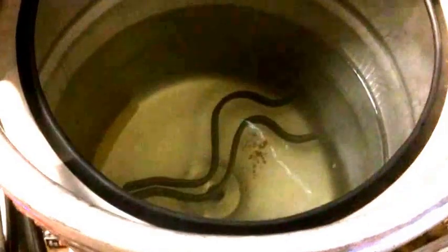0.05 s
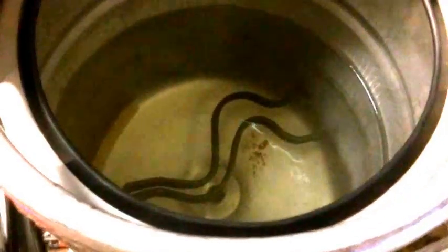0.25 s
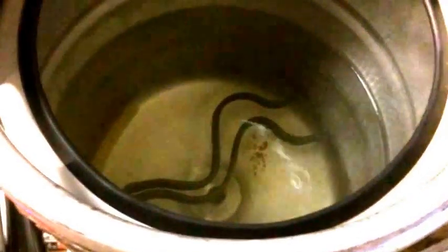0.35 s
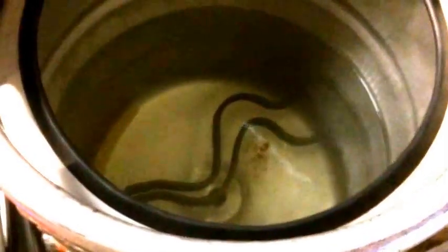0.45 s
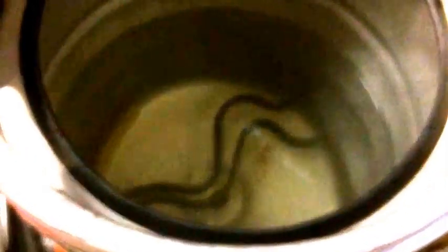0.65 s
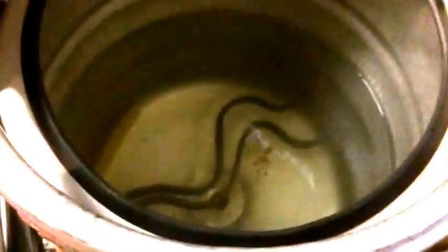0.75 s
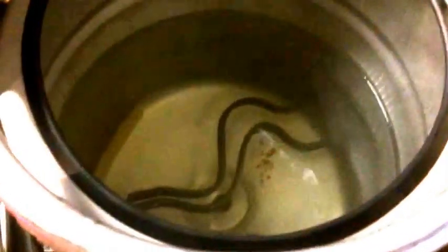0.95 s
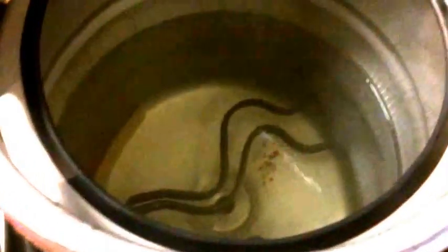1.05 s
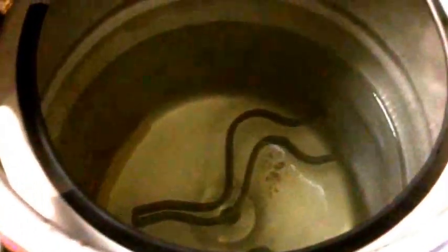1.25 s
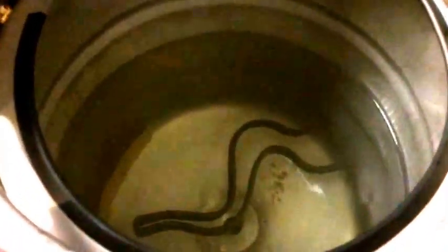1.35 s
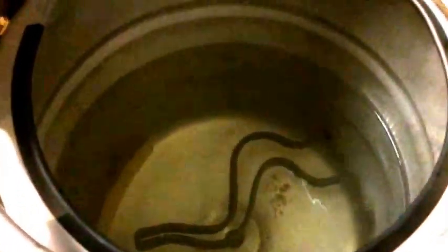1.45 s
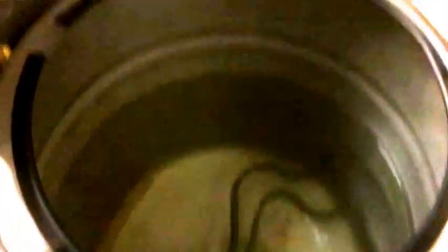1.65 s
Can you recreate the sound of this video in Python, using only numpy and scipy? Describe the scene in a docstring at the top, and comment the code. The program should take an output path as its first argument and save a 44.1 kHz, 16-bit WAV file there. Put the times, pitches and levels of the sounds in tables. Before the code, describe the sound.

A handled camera's plastic case creaks in three short, sharp clicks, the second with a dull thud. A faint hum and hiss with tiny ticks continue in the quiet room. The handling is right at the microphone.

```python
"""A faint hum with a thin whine, hiss, crackle and tiny ticks fills a quiet room.
A camera is handled above an open metal kettle, and its plastic shell creaks in three short bursts:
in stick-slip friction, each slip is an impulse that excites the shell's damped modes.
The fingers rub the case softly and the hand bumps it with dull thuds;
the harder contacts also set the hollow case ringing."""
import sys
import numpy as np
from scipy import signal
from scipy.fft import rfft, irfft, next_fast_len
from scipy.io import wavfile
from scipy.ndimage import map_coordinates

SR = 44100
rng = np.random.default_rng(int(sys.argv[2]) if len(sys.argv) > 2 else 0)


def pcm_store(signal):
    """Save signal as 16-bit PCM."""
    levels = np.round(np.clip(np.atleast_2d(signal), -1, 1) * 32767)
    wavfile.write(sys.argv[1], SR, levels.astype(np.int16).T)


N = 74970


def amp(db):
    """Amplitude ratio of a level in decibels."""
    return 10 ** (np.asarray(db) / 20)


def gain_at(spectrum, hz):
    """Spectral envelope: gain at hz, from (frequency, level) points joined on a log frequency axis."""
    frequencies, levels = np.transpose(spectrum)
    return amp(np.interp(np.log(hz + 1), np.log(frequencies + 1), levels))


def wobble(rate):
    """Random modulation: a smooth curve through `rate` Gaussian values a second."""
    return map_coordinates(rng.standard_normal(512), [np.arange(N) * rate / SR], mode="wrap")


def noise(spectrum):
    """Spectral shaping: white noise filtered by the envelope and scaled to rms 1."""
    size = next_fast_len(N + SR // 2)
    hz = np.fft.rfftfreq(size, 1 / SR)
    shaped = irfft(rfft(rng.standard_normal(size)) * gain_at(spectrum, hz), size)[:N]
    return shaped / np.sqrt(np.mean(shaped ** 2) + 1e-20)


def pulse(spectrum, pitch=1, cutoff_hz=SR, size=8192):
    """Minimum-phase impulse response of peak 1, shifted in pitch and dulled above cutoff_hz."""
    hz = np.fft.rfftfreq(size, 1 / SR)
    magnitude = gain_at(spectrum, hz / pitch) / (1 + (hz / cutoff_hz) ** 2)
    cepstrum = irfft(np.log(magnitude))
    cepstrum[1:size // 2] *= 2  # folding onto positive time makes the pulse causal
    cepstrum[size // 2 + 1:] = 0
    wave = irfft(np.exp(rfft(cepstrum)))
    return wave / np.abs(wave).max()


def ring(modes, t, pitch=1):
    """Free vibration: a sum of exponentially damped modes."""
    return sum(amp(db - 60 * t / t60) * np.sin(2 * np.pi * hz * pitch * t) for hz, db, t60 in modes)


def add(track, start_s, sound):
    """Superposition: the sound adds to the track from start_s on."""
    part = track[round(start_s * SR):][:len(sound)]
    part += sound[:len(part)]


# spectrum of the room noise: (frequency [Hz], relative spectral density [dB])
ROOM_SPECTRUM = [(20, -25), (45, -1.5), (75, 0), (130, -5.5), (170, -4.5), (220, -18.5), (330, -12),
                 (450, -15), (650, -12), (800, -19), (950, -10.5), (1150, -21.5), (1400, -20.5),
                 (1700, -28.5), (2100, -22), (3100, -31), (3900, -30.5), (5200, -41.5), (6500, -42),
                 (10000, -47.5), (15000, -48.5)]
# tones of the hum and whine: (frequency [Hz], rms level [dB], modulation rate [Hz])
HUM_TONES = [(80.7, -60.5, 8.6), (164.4, -63, 5.24), (560.7, -66, 7), (1017, -61, 7.1), (1876, -74, 13),
             (2135, -85, 17)]
# slow swell of noise and hum together: (time [s], relative level [dB])
ROOM_SWELL = [(0.0, -52.5), (0.434, -55.5), (0.766, -52.5), (1.7, -53)]
def room_tone():
    """Broadband noise plus hum, as of a small fan; amplitude and phase modulation widen each tone."""
    t = np.arange(N) / SR
    hiss = amp(-51 + 1.15 * wobble(rate=8.9)) * noise(ROOM_SPECTRUM)
    hum = np.zeros(N)
    for hz, db, rate in HUM_TONES:
        rms = amp(db + 1.8 * wobble(rate))
        phase_drift = .65 * wobble(2 * rate)
        hum += rms * np.sqrt(2) * np.sin(2 * np.pi * hz * t + phase_drift)
    times, levels = np.transpose(ROOM_SWELL)
    swell_db = np.interp(t, times, levels)
    return amp(swell_db - np.median(swell_db)) * (hiss + hum)


# spectrum of one crackle grain: (frequency [Hz], relative level [dB])
GRAIN_SPECTRUM = [(500, -37), (1700, -9), (2300, -2.5), (3100, -7.5), (3900, -0.5), (5000, -21),
                  (10000, -29.5)]
def crackle(grains_per_s=150, peak_db=-55.5, spread_db=2):
    """Shot noise: faint grains at independent random times make a fine crackle."""
    onsets = rng.random(N) < grains_per_s / SR
    strengths = amp(peak_db + spread_db * np.clip(rng.standard_normal(N), -2, 2))
    return signal.fftconvolve(onsets * strengths, pulse(GRAIN_SPECTRUM))[:N]


# tiny dry ticks: (time before the delay [s], peak level [dB])
TICK_EVENTS = [(0.0693, -48), (0.2702, -52), (0.4303, -49), (0.5705, -48), (0.8712, -51), (1.073, -48),
               (1.1478, -47), (1.4056, -48), (1.4329, -48.5), (1.471, -51)]
# spectrum of one tick: (frequency [Hz], relative level [dB])
TICK_SPECTRUM = [(500, -20), (3000, 3), (6500, 4), (10000, -4.5), (15000, -12.5)]
def ticks(delay_s=.0015):
    """A brief impulse has a broad spectrum: each is heard as a bright tick just above the hiss."""
    track, tick = np.zeros(N), pulse(TICK_SPECTRUM)
    for start_s, db in TICK_EVENTS:
        add(track, start_s + delay_s, amp(db) * tick)
    return track


# envelope of the rub before the loudest bump: (time [s], level [dB])
RUB_ENVELOPE = [(.09, -85), (.116, -56.5), (.145, -51), (0.179, -52), (0.222, -55.5)]
# spectrum of skin sliding on the case: (frequency [Hz], relative spectral density [dB])
RUB_SPECTRUM = [(100, -20), (260, -6), (340, 0), (460, -25), (660, 0.5), (820, -12), (2000, -19),
                (8000, -46)]
def finger_rub():
    """Sliding friction: skin on the hollow case makes a brief swell of soft noise."""
    times, levels = np.transpose(RUB_ENVELOPE)
    envelope = np.interp(np.arange(N) / SR, times, amp(levels), left=0, right=0)
    return envelope * noise(RUB_SPECTRUM)


# soft pushes of the hand: (time [s], peak level before the decay [dB], pitch [ratio], cutoff [Hz])
HAND_BUMPS = [(0.2187, -20, 0.55, 109), (0.2321, -1, 0.94, 358), (0.2472, -11.5, 1.5, 68.6),
              (0.3138, -21.5, 0.96, 45), (0.353, -37, 1.05, 60), (0.782, -42, 1.3, 81),
              (1.423, -40.5, 1.7, 130), (1.5881, -31.5, 3.2, 450), (1.612, -36, 1.24, 118)]
# spectrum of one thud: (frequency [Hz], relative level [dB])
THUD_SPECTRUM = [(10, -21.5), (25, -14), (42, -2), (62, 2), (100, -4), (135, -10.5), (190, -9.5),
                 (250, -22), (350, -29.5), (700, -44.5), (2000, -53)]
# hard contacts within the bumps: (time [s], gain [dB], pitch [ratio], rise time [s])
HARD_KNOCKS = [(.2346, -18, 1.0, .0002), (.3175, -21, .88, .0025)]
# modes of the hollow case: (frequency [Hz], relative level [dB], 60 dB decay time [s])
CASE_MODES = [(671, 4, 0.011), (1416, 3.5, 0.0057), (2500, -30, 0.0078)]
def hand_bumps(decay_t60_s=.16):
    """Impact excitation: slow contacts spare the high modes and thud; hard ones ring the case."""
    track, t = np.zeros(N), np.arange(SR // 10) / SR
    thud_decay = amp(-60 * t / decay_t60_s)
    for start_s, db, pitch, cutoff_hz in HAND_BUMPS:
        thud = pulse(THUD_SPECTRUM, pitch, cutoff_hz)[:len(t)]
        add(track, start_s, amp(db) * thud_decay * thud)
    for start_s, db, pitch, rise_s in HARD_KNOCKS:
        attack = 1 - np.exp(-(t / rise_s) ** 2)
        add(track, start_s, amp(db) * attack * ring(CASE_MODES, t, pitch))
    return track


# slips of the plastic shell: (time [s], relative level [dB], pitch [ratio])
SHELL_SLIPS = [(.056, -45, .8), (.13567, -19, .92), (.13987, -21, .93), (.14318, -17, .96),
               (.14536, -24, .98), (.1474, -24, .87), (.14933, -31, .83), (.14985, -28, .91),
               (.15107, -28, .92), (.15234, -30, .89), (.1532, -26, .81), (.15493, -30, .96),
               (.23469, -23, .72), (.23811, -21, .88), (.23894, -18, .94), (.23942, -18, .98),
               (.23973, -25, .85), (.24212, -32, .98), (.24463, -27, .97), (.24515, -22, 1.01),
               (.24544, -27, .99), (.3208, -44, .62), (.73058, -28, .78), (.73096, -32, .87),
               (.73246, -26, .79), (.73388, -20, 1.0), (.73443, -28, 1.06), (.7351, -27, 1.03),
               (.73599, -32, 1.09), (.73867, -37, .84), (1.4065, -46, .85), (1.587, -47, .85)]
# spectrum of one slip's snap: (frequency [Hz], relative level [dB])
SNAP_SPECTRUM = [(200, -35), (900, -21), (1650, -17), (2350, 1), (3100, 0), (4200, 4.5), (5300, -6.5),
                 (6500, -16.5), (8000, -15.5), (10500, -33.5), (15000, -32)]
# modes of the shell: (frequency [Hz], relative level [dB], 60 dB decay time [s])
SHELL_MODES = [(2430, -23.5, 0.038), (2810, -17.5, .02), (3180, -28.5, 0.06), (3730, -27, 0.013),
               (4540, -30, 0.017), (5690, -28, 0.013)]
def shell_creaks(gain_db=-1, scatter_db=-15, scatter_t60_s=.015):
    """Stick-slip friction: each slip snaps, rings the shell and scatters into a short diffuse echo."""
    track = np.zeros(N)
    for start_s, db, pitch in SHELL_SLIPS:
        snap = pulse(SNAP_SPECTRUM, pitch)
        t = np.arange(len(snap)) / SR
        reflections = rng.standard_normal(len(t)) * amp(-60 * t / scatter_t60_s)
        scatter = signal.fftconvolve(reflections, snap / np.linalg.norm(snap))[:len(t)]
        click = snap + ring(SHELL_MODES, t) + amp(scatter_db) * scatter
        add(track, start_s, amp(db + gain_db) * click)
    return track


def scene():
    """Linear superposition: the room and the handling sounds add in one channel."""
    return (room_tone() + crackle() + ticks() + finger_rub() + hand_bumps() + shell_creaks())[None]


def record(dry, low_cut_hz=30, top_hz=15600):
    """Band limiting: the camera attenuates the lowest rumble and passes nothing above top_hz."""
    size = next_fast_len(N + SR // 2)
    hz = np.fft.rfftfreq(size, 1 / SR)
    high_pass = hz ** 4 / (hz ** 4 + low_cut_hz ** 4)
    return irfft(rfft(dry, size) * high_pass * (hz < top_hz), size)[..., :N]


dry = scene()
out = record(dry)
pcm_store(out)
```